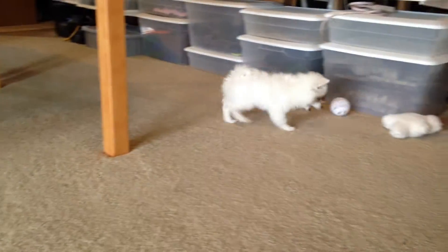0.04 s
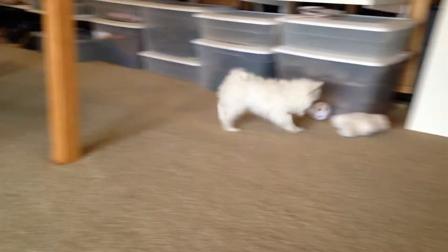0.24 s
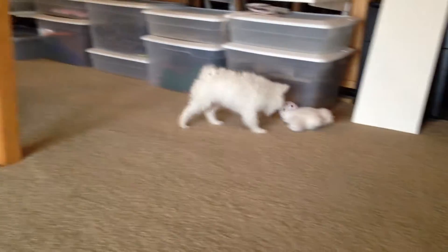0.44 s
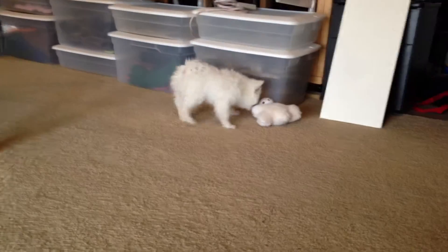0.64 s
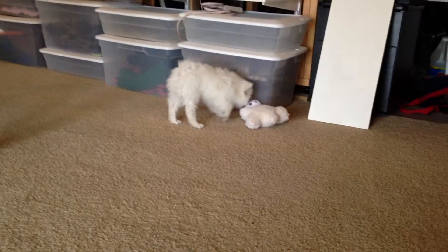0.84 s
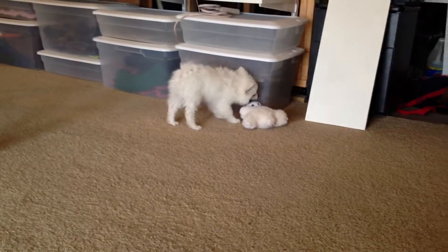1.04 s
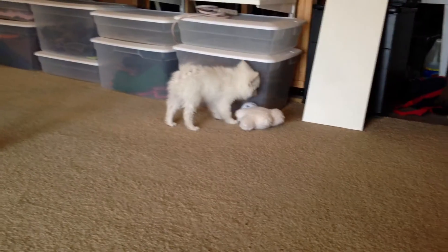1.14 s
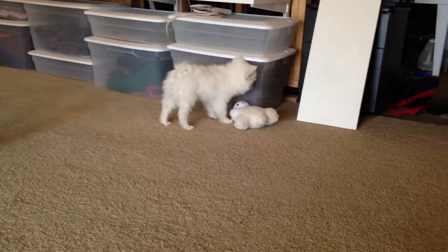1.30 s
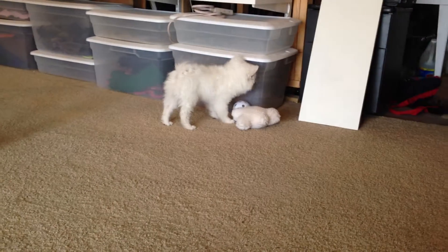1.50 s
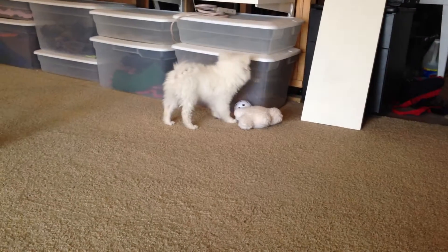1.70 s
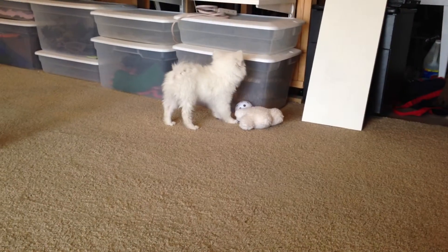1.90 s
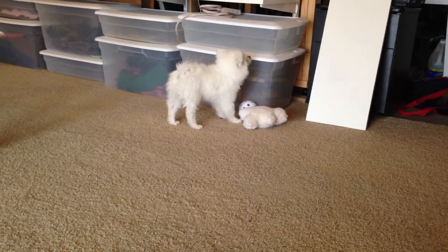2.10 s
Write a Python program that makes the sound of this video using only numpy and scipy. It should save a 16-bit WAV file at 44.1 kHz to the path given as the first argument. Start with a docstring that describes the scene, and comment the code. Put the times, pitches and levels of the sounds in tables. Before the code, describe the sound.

In a small, damped room, a plastic ball hits a storage bin with one sharp, hollow knock. A faint roll and some soft bumps follow as a puppy nudges the bin, heard from a few metres over light hiss.

```python
"""A puppy and a hollow plastic ball, a few metres from the microphone in a small, well damped room.
Over a faint steady hiss, the puppy pushes the ball across carpet into a plastic storage bin.
At 0.2 s it knocks: the ball's shell clicks and the bin's wall booms for a few cycles.
The ball rolls back with a faint rumble. From 0.7 s soft nudges thump the bin,
with one tiny high scratch among them, and then only the hiss is left."""
import sys
import numpy as np
from scipy import signal
from scipy.fft import rfft, irfft
from scipy.io import wavfile
from scipy.ndimage import uniform_filter1d

SR = 44100
rng = np.random.default_rng(int(sys.argv[2]) if len(sys.argv) > 2 else 0)


def inscribe(sig):
    """Save sig as 16-bit PCM at rate SR to the path in sys.argv[1].

    A 1-D sig is mono; a 2-D sig holds one channel per row.
    Samples are clipped to [-1, 1] before scaling.
    """
    pcm = np.round(np.clip(np.atleast_2d(sig).T, -1, 1) * 32767)
    wavfile.write(sys.argv[1], SR, pcm.astype(np.int16))


N = 94815

# Spectrum of the room tone: f/Hz, relative level/dB
HISS_SPECTRUM = [(18, -46), (30, -49), (69, -21), (122, -2.5), (211, -7.5), (240, -2.5), (328, -6.5),
                 (404, -2), (581, -9.5), (953, -10.5), (1090, -12.5), (1300, -11), (1730, -16),
                 (2310, -14.5), (15000, -20)]
# Room reverberation by band: f/Hz, level/dB, t60/s
ROOM_BANDS = [(400, -7.5, 0.23), (800, -6.5, .2), (1600, -3.5, 0.18), (2960, -5, 0.12), (6400, -16.5, 0.25),
              (13000, -5.5, 0.11)]
# Spectrum of the ball rolling on carpet: f/Hz, relative level/dB
ROLL_SPECTRUM = [(80, -12), (180, 6), (450, -1.5), (900, -28), (1600, -17.5), (1800, -4), (2050, -17),
                 (8000, -25)]
# Spectrum of the scratch: f/Hz, relative level/dB
SCRATCH_SPECTRUM = [(1000, -25), (3000, -4), (5500, -1), (10000, -5), (15000, -8)]
# Modes of the bin's body: f/Hz, relative level/dB, t60/s, build-up/s
BIN_MODES = [(148.6, -14, 0.19, 0.011), (166, 5.5, 0.15, 0.017), (221.2, 2.5, .14, 0.0016),
             (269.3, -7.5, 0.12, 0.018), (398, -17, 0.072, 0.0018), (640, -13, 0.025, 0.00069)]
# Modes of a light tap on the plastic: f/Hz, relative level/dB
TAP_MODES = [(830, 2), (1200, -2.5), (3900, -3), (4500, -5), (6500, -20)]
# Nudges against the bin: t/s, level/dB, contact time/ms
NUDGE_EVENTS = [(0.017, -61.5, 0.53), (0.7002, -35.5, .1), (0.7336, -38, 0.17), (0.943, -61, 1.4),
                (0.9896, -46, 0.053), (1.384, -57.5, 1.44)]
# Spectrum of the ball's click: f/Hz, relative level/dB
CLICK_SPECTRUM = [(120, -40), (300, -29), (600, -27), (1300, -7.5), (2000, -13.5), (2900, -21), (3800, -13),
                  (5300, -15.5), (7500, -14), (8700, -22), (10300, -19), (15000, -36.5)]
# Modes of the ball's shell: f/Hz, level/dB, t60/s
SHELL_MODES = [(453, -33, 0.13), (599, -22.5, 0.017), (707, -22, 0.023), (924, -23, 0.01),
               (1250, -31, 0.0059), (3690, -48, 0.013), (5303, -26, 0.0086), (6350, -39, 0.012),
               (9620, -37.5, 0.0074)]

KNOCK_S, CONTACT_S = 0.2079, 0.02478  # when the ball meets the wall, and how long they touch


def undb(db):
    """Decibels to gain."""
    return 10 ** (np.asarray(db) / 20)


def fade(age, t60):
    """Exponential decay, 60 dB down after t60 seconds."""
    return np.exp(-np.log(1000) * np.maximum(age, 0) / t60)


def at(x, start):
    """Delay a sound by start seconds."""
    return np.concatenate([np.zeros(int(start * SR)), x])[:N]


def ring(modes, t):
    """Fading sines of a struck object."""
    return sum(undb(db) * np.sin(2 * np.pi * hz * t) * fade(t, t60) for hz, db, t60 in modes)


def colour(x, points):
    """Minimum-phase filter through points of f/Hz, level/dB."""
    hz, db = np.array(points).T
    size = 2 * N
    f = np.maximum(np.fft.rfftfreq(size, 1 / SR), 1)
    gain = undb(np.interp(np.log(f), np.log(hz), db))
    cepstrum = irfft(np.log(gain))
    cepstrum[1:N] *= 2
    cepstrum[N + 1:] = 0
    return irfft(rfft(x, size) * np.exp(rfft(cepstrum)))[:N]


def whiten(x, bins=1500):
    """Iron the broad bumps out of a burst's spectrum."""
    spectrum = rfft(x)
    smooth_power = uniform_filter1d(np.abs(spectrum) ** 2, bins)
    return irfft(spectrum / np.sqrt(smooth_power), N)


def low_cut(x, hz):
    """Steep high-pass."""
    return signal.sosfilt(signal.butter(4, hz, "high", fs=SR, output="sos"), x)


def hiss(level_db=-65):
    """Room tone: steady air and the microphone's own hiss."""
    air = colour(rng.standard_normal(N), HISS_SPECTRUM)
    return undb(level_db) * air / air.std()


def room(x, t, delay_s=0.004, build_s=0.0028):
    """Diffuse reflections reach the microphone just after the direct sound and die away band by band."""
    log_f = np.log(np.maximum(np.fft.rfftfreq(N, 1 / SR), 1))
    centres = np.log([row[0] for row in ROOM_BANDS])
    reflections = rng.standard_normal(N) * np.minimum(t / build_s, 1)
    tail = np.zeros(N)
    for (_, db, t60), share in zip(ROOM_BANDS, np.eye(len(ROOM_BANDS))):
        decay = whiten(reflections * fade(t, t60), bins=250)
        band = np.interp(log_f, centres, share)
        tail += undb(db) * irfft(rfft(decay) * band, N)
    return signal.fftconvolve(low_cut(x, hz=300), at(tail[:N // 2], delay_s))[:N]


def roll(t, peak_s=0.39, width_s=0.14, level_db=-64.5):
    """A faint rumble swells and dies as the ball rolls back over the carpet."""
    rumble = colour(rng.standard_normal(N), ROLL_SPECTRUM)
    swell = np.exp(-0.5 * ((t - peak_s) / width_s) ** 2)
    return undb(level_db) * rumble / rumble.std() * swell


def scratch(t, start_s=0.967, level_db=-59):
    """A tiny high scratch, perhaps a claw on plastic."""
    noise = colour(rng.standard_normal(N), SCRATCH_SPECTRUM)
    return undb(level_db) * at(noise / noise.std() * fade(t, t60=0.03), start_s)


def bin_hum(t, delay_s=0.00356):
    """The bin's low modes swell in, each at its own pace, as a blow spreads through it."""
    hum = sum(ring([(hz, db, t60)], t) * np.minimum(t / build, 1) for hz, db, t60, build in BIN_MODES)
    return at(hum, delay_s)


def nudges(t, tap_t60_cycles=9.2):
    """Light pushes tap and ring the bin; the longer the contact, the duller the thump."""
    tap = ring([(hz, db, tap_t60_cycles / hz) for hz, db in TAP_MODES], t)
    response = bin_hum(t) + undb(-2) * tap
    thumps = np.zeros(N)
    for start, db, contact_ms in NUDGE_EVENTS:
        age = t * 1000 / contact_ms  # in contact times
        push = age * np.exp(-np.pi * np.minimum(age, 20)) * (age < 20)
        thump = signal.fftconvolve(response, push / push.sum())[:N]
        thumps += undb(db) * at(thump, start)
    return thumps


def wall_boom(t, start_hz=218.2, sag_hz_per_s=2050, attack_s=0.001):
    """The bin's wall swings for a few cycles, sagging in pitch, and is then choked."""
    hz = start_hz - sag_hz_per_s * np.minimum(t, CONTACT_S)
    phase = 2 * np.pi * np.cumsum(hz) / SR
    buzz = undb(-20.5) * np.sin(2 * phase)  # the flexing wall's second harmonic
    envelope = np.minimum(t / attack_s, 1) * fade(t, t60=0.19)
    choke = fade(t - CONTACT_S, t60=0.017)
    return undb(-12.5) * envelope * choke * (np.sin(phase) + buzz)


def ball_click(t):
    """A sharp contact and the dense, short ring of thin plastic."""
    envelope = fade(t, t60=0.0013) + undb(-9) * fade(t, t60=0.021)
    burst = rng.standard_normal(N) * envelope
    snap = 0.2 * (t == 0)
    contact = whiten(burst / np.linalg.norm(burst) + snap)
    return undb(6) * colour(contact, CLICK_SPECTRUM)


def knock(t):
    """The ball clicks and rings, the wall booms while they touch, and the bin hums as the ball leaves."""
    ball = ball_click(t) + at(ring(SHELL_MODES, t), start=0.0004)
    wall = at(wall_boom(t), start=0.003544)
    release = undb(-32) * at(bin_hum(t), CONTACT_S)
    return at(ball + wall + release, KNOCK_S)


def scene():
    """Ball, bin and room as one microphone hears them from a few metres away."""
    t = np.arange(N) / SR
    # the deep bass of the knock and nudges is steeply thinned
    direct = low_cut(knock(t) + nudges(t), hz=114)
    mix = direct + room(direct, t) + scratch(t) + roll(t) + hiss()
    return mix[None]


def record(dry, top_hz=15400):
    """The recorder cuts the top treble steeply."""
    return signal.sosfilt(signal.ellip(10, 0.1, 80, top_hz, fs=SR, output="sos"), dry)


dry = scene()
out = record(dry)
inscribe(out)
```